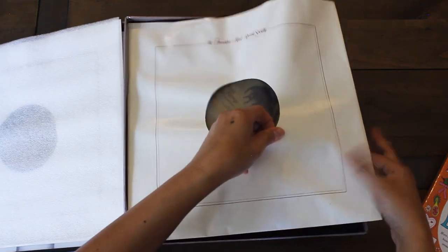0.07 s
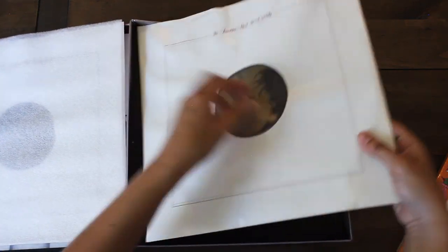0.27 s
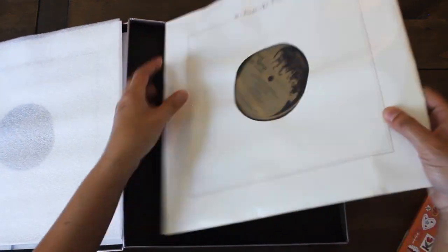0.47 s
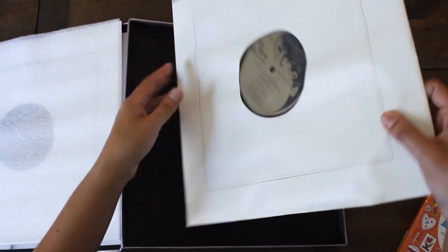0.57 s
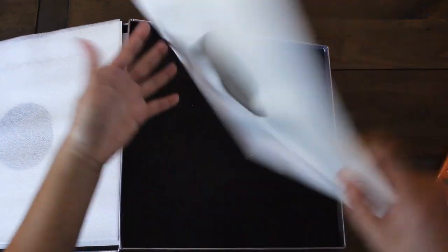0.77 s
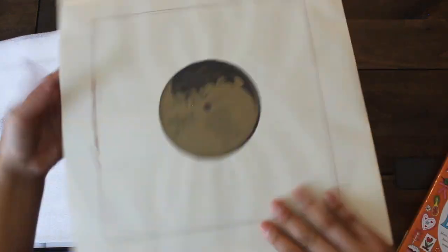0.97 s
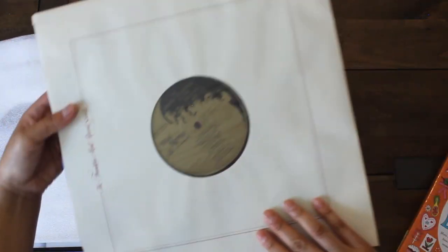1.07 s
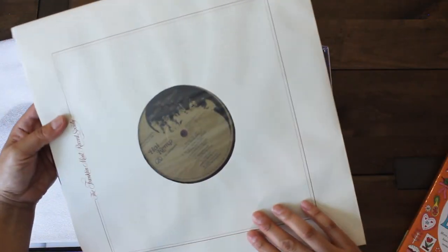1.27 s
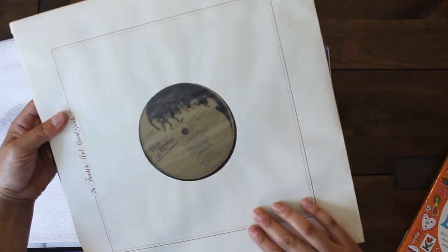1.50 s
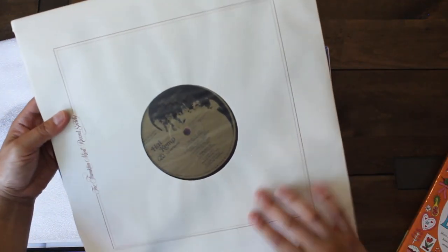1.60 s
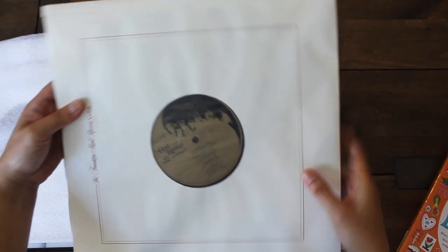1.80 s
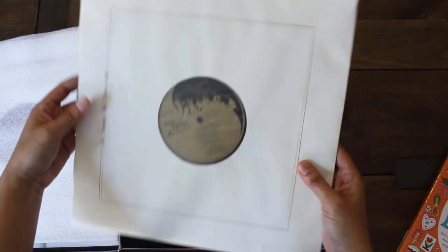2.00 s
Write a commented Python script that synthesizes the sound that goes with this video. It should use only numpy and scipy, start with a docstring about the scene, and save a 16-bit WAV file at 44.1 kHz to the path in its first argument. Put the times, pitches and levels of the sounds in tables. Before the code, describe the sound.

A paper record sleeve slides and pops as it buckles. At 0.3 seconds the vinyl disc inside knocks on a cardboard box and judders along it, knocking again just after 0.5 and bumping free by 0.8. From 0.9 seconds fingers softly tick and brush the paper. After a lull, a light hollow tap comes near 2 seconds. Faint noise and a low hum fill the slightly echoing room.

```python
"""A vinyl record in a paper sleeve is lifted out of a cardboard box in a fairly live room.
First the sleeve slides, and the paper pops as it buckles. At 0.3 s the disc's edge knocks on the box
and starts to judder along it. It knocks again just after 0.5 s, then bumps lightly as it comes free.
From about 0.9 s fingers tick, pat and brush on the paper as it is turned. Near 2 s a hand takes hold
with a light tap. Faint room noise and a mains hum go on throughout."""
import sys
import numpy as np
from scipy import signal
from scipy.fft import rfft, irfft
from scipy.io import wavfile

SR = 44100
rng = np.random.default_rng(int(sys.argv[2]) if len(sys.argv) > 2 else 0)


def transcribe(signal):
    """Save signal, clipped to [-1, 1], as a 16-bit WAV file at the path in sys.argv[1]."""
    frames = np.atleast_2d(signal).T
    limited = np.clip(frames, -1, 1)
    pcm = np.round(limited * 32767).astype(np.int16)
    wavfile.write(sys.argv[1], SR, pcm)


N = 90404
T = np.arange(N) / SR

# The tone of the room noise. Each row: frequency in Hz, level in dB.
NOISE_TONE = [(25, -6), (60, -3.5), (170, -3), (330, 2.5), (480, -4), (750, -6), (1500, -11.5), (4500, -16),
              (9000, -21.5), (16000, -24)]
# How strongly the sleeve slides over the box. Each row: time in seconds, level in dB.
SLIDE_LEVELS = [(0, -42), (.065, -38), (.085, -54), (.165, -43), (.195, -30.5), (.245, -43), (.27, -35),
                (.33, -26), (.44, -30.5), (.51, -34.5), (.55, -59), (.72, -44), (.8, -58)]
# The tone of that sliding. Each row: frequency in Hz, level in dB.
SLIDE_TONE = [(80, -19.5), (400, 9.5), (1000, 3.5), (2000, 5), (4500, -3), (7000, -13.5), (11000, -30),
              (16000, -28)]
# How strongly fingers and air brush the paper. Each row: time in seconds, level in dB.
BRUSH_LEVELS = [(0, -48), (.185, -51), (.2, -39.5), (.245, -31.5), (.33, -43), (.46, -51), (.485, -34),
                (.53, -40), (.56, -46), (.79, -52), (.825, -40.5), (.87, -48.5), (.92, -38), (1.09, -46),
                (1.22, -60), (1.64, -69), (1.69, -45.5), (1.79, -67), (1.84, -55.5), (1.93, -56),
                (2.0, -41), (2.1, -42)]
# The tone of that brushing. Each row: frequency in Hz, level in dB.
BRUSH_TONE = [(100, 3), (500, 1), (1500, -4), (3000, -3), (4800, -1.5), (7000, -4), (11000, -10),
              (16000, -8)]
# The paper buckles. Each row: start in seconds, level in dB, fade time in seconds, treble cut-off in Hz.
BUCKLE_POPS = [(0.0580, -36.5, 0.0066, 5940), (0.1734, -12, 0.0029, 3950), (0.2153, -10.5, 0.0045, 1980),
               (0.225, -8.5, 0.0021, 4000), (0.237, -18, 0.0019, 6000), (0.2478, -25, 0.0024, 3000),
               (0.2803, -7.5, 0.0027, 6050), (0.5356, -3, 0.0014, 3000), (0.8872, -31.5, .004, 5000),
               (0.9255, -26, 0.0022, 6000), (1.7470, -38.5, .004, 4000), (1.8276, -38, 0.0022, 6000),
               (1.8595, -40.5, .003, 9000), (1.8830, -42, .003, 5000), (1.9090, -42, 0.0018, 3020),
               (1.9676, -35.5, 0.0067, 9000), (1.9740, -19, 0.0041, 10300)]
# The tone of those pops. Each row: frequency in Hz, level in dB.
BUCKLE_TONE = [(60, -37.5), (300, -4), (700, -4.5), (1600, -0.5), (2600, -5.5), (4800, -6.5), (6500, -19.5),
               (10000, -25), (16000, -52)]
# Fingers and creases tick. Each row: start in seconds, level in dB, pitch in Hz, fade time in seconds.
PAPER_TICKS = [(0.1250, -32, 12400, 0.0016), (0.1690, -28, 4160, .002), (0.1940, -30, 9000, 0.0055),
               (0.236, -26, 8900, 0.0045), (0.2808, -15, 4800, 0.0011), (0.2977, -15, 7200, 0.0037),
               (0.379, -22, 6860, 0.00089), (0.517, -23, 4540, 0.0036), (0.5226, -22.5, 8400, 0.0028),
               (0.5341, -16, 7400, 0.0017), (0.9104, -21.5, 5600, 0.0017), (1.0584, -33, 4800, .002),
               (1.0860, -28, 4300, 0.0017), (1.156, -25.5, 4100, 0.0028), (1.1660, -28.5, 4440, 0.001),
               (1.666, -29, 4440, .001), (1.6998, -48, 5000, .002), (1.7230, -34, 4700, 0.0018),
               (1.7474, -36, 4260, .002), (1.8204, -30, 11000, 0.0018), (1.8272, -26.5, 4870, 0.0018),
               (1.8592, -39, 7540, .003), (1.8823, -38, 4860, .002), (1.9482, -24, 4300, 0.00099)]
# The disc knocks on the box. Each row: start in seconds, level in dB, treble cut-off in Hz
# (higher for a harder knock), fade time of the scuff in seconds.
DISC_KNOCKS = [(0.2916, -10, 5000, 0.0015), (0.2931, -3, 890, 0.0081), (0.2978, -7, 3600, 0.0068),
               (0.3761, -20.5, 7000, 0.0034), (0.531, -29, 900, 0.0033), (0.5355, -6.5, 4900, 0.00097),
               (0.5390, -18, 805, 0.003), (0.5972, -20, 920, 0.015), (0.6116, -21.5, 600, 0.0095),
               (0.672, -34, 600, .005), (0.7041, -27.5, 1800, 0.0022)]
# The tone of scuffed cardboard. Each row: frequency in Hz, level in dB.
SCUFF_TONE = [(40, -60), (120, -9.5), (300, -7.5), (550, 8.5), (1000, 2.5), (1900, 1), (3500, -9),
              (8000, -12), (16000, -22.5)]
# The notes that box and disc ring with. Each row: pitch in Hz, level in dB, seconds to fade by 60 dB.
KNOCK_NOTES = [(126.4, -19, 0.11), (203.6, -15, 0.086), (295.4, -12.5, 0.11), (443, -8, 0.082),
               (502.4, -1.5, 0.08), (583, -17, 0.095), (792, -13.5, .05), (985, -4.5, 0.044),
               (1234, -6, 0.027), (1655, -16, 0.023), (2030, -38, .02), (2470, -22, 0.025),
               (2645, -2.5, 0.017)]
# How strongly the disc's edge judders along the box. Each row: time in seconds, level in dB.
JUDDER_LEVELS = [(.30, -51.5), (.32, -28), (.36, -31), (.45, -35), (.58, -38.5), (.605, -20.5), (.65, -31),
                 (.73, -28), (.765, -55), (.86, -46.5), (.95, -67)]
# The notes that the dragged edge stirs up. Each row: pitch in Hz, level in dB, filter width in Hz.
JUDDER_NOTES = [(247, -8.5, 68), (304, -11, 30), (456.3, 0.5, 45), (504.7, -2.5, 32), (781, -9, 78)]
# Fingers tap the sleeved disc. Each row: start in seconds, level in dB.
FINGER_TAPS = [(1.0004, -35.5), (1.059, -35.5), (1.088, -34), (1.165, -39), (1.2016, -40), (1.9690, -30.5),
               (1.978, -17.5)]
# The sleeved disc's dull ring. Each row: pitch in Hz, level in dB, seconds to fade by 60 dB.
TAP_NOTES = [(374, -9.5, 0.072), (459, -2.5, .025), (580, 1, .02), (750, -6, 0.031), (1250, -14, 0.018),
             (1610, -8.5, 0.011)]
# The room's echo. Each row: frequency in Hz, seconds to fade by 60 dB, level in dB.
ECHO_BANDS = [(97, 1, -2.5), (238, 1, -4), (515, 0.72, -9.5), (1010, 1, -2.5), (1930, 0.87, -5),
              (4170, 0.68, -9), (8900, 0.56, -9), (16200, 0.23, -15)]


def from_db(db):
    """Turn decibels into a number to multiply a sound by."""
    return 10 ** (np.asarray(db) / 20)


def rms_one(x):
    """Scale a sound so that its average strength (rms) is 1."""
    return x / np.sqrt(np.mean(x ** 2) + 1e-20)


def level(curve):
    """Join (seconds, dB) points into a volume curve that is silent after the last one."""
    return from_db(np.interp(T, *np.transpose(curve), right=-np.inf))


def coloured(x, tone, size=8192):
    """Give a sound the balance of bass and treble in a tone table; white noise keeps its power."""
    hz, db = np.transpose(tone)
    bin_hz = np.fft.rfftfreq(size, 1 / SR)
    gain = rms_one(from_db(np.interp(np.log(bin_hz + 1), np.log(hz), db)))
    # These steps build the filter so that it never sounds before its input does.
    cepstrum = irfft(np.log(gain))
    cepstrum[1:size // 2] *= 2
    cepstrum[size // 2 + 1:] = 0
    return signal.fftconvolve(x, irfft(np.exp(rfft(cepstrum))))[:N]


def softened(x, cut_hz):
    """Turn down the treble, as a softer contact does."""
    return signal.lfilter(*signal.butter(1, cut_hz, fs=SR), x)


def resonance(x, hz, width_hz):
    """Make a sound ring around one pitch; a smaller width rings longer."""
    r = np.exp(-np.pi * width_hz / SR)
    feedback = [1, -2 * r * np.cos(2 * np.pi * hz / SR), r * r]
    return signal.lfilter(np.sqrt((1 - r * r) / 2) * np.array([1, 0, -1]), feedback, x)


def burst(start, fade_s):
    """A flurry of tiny slips that falls to about a third of its strength in fade_s."""
    age = T - start
    return rng.choice([-1., 1.], N) * (age >= 0) * np.exp(-np.abs(age) / fade_s) + 1e-18


def struck(start, notes, scatter_db=1.5):
    """A struck object rings with several fading notes, each at a slightly random strength."""
    hz, db, ring_s = np.transpose(notes)[:, :, None]
    age = T[:SR // 2]
    strength = from_db(scatter_db * rng.standard_normal(hz.shape)) * rng.choice([-1, 1], hz.shape)
    ring = (strength * from_db(db - 60 * age / ring_s) * np.sin(2 * np.pi * hz * age)).sum(0)
    return np.pad(ring, (int(start * SR), N))[:N]


def friction(grains_per_s=3500, grain_share=0.55, spread_db=3, surge_db=2, surges_per_s=70):
    """Paper fibres catch and let go: tiny uneven clicks (grains) on a smooth hiss, in short surges."""
    sizes = from_db(spread_db * np.minimum(rng.exponential(1, N), 4)) * rng.choice([-1, 1], N)
    grains = rms_one(sizes * (rng.random(N) < grains_per_s / SR))
    surges = from_db(surge_db * np.interp(T * surges_per_s, np.arange(N), rng.standard_normal(N)))
    hiss = rng.standard_normal(N)
    return rms_one(surges * (np.sqrt(grain_share) * grains + np.sqrt(1 - grain_share) * hiss))


def background(noise_db=-48.5, hum_db=-53, hum_hz=100.5):
    """Steady room noise and the low hum of mains power."""
    noise = coloured(rng.standard_normal(N), NOISE_TONE)
    hum = np.sqrt(2) * np.sin(2 * np.pi * hum_hz * T)
    return from_db(noise_db) * noise + from_db(hum_db) * hum


def rustle():
    """Paper slides on cardboard and brushes under the fingers."""
    slide = coloured(friction() * level(SLIDE_LEVELS), SLIDE_TONE)
    brush = coloured(friction() * level(BRUSH_LEVELS), BRUSH_TONE)
    return slide + brush


def buckles():
    """The paper pops from one bend into another."""
    pops = sum(from_db(db) * softened(burst(start, fade_s), cut_hz)
               for start, db, fade_s, cut_hz in BUCKLE_POPS)
    return coloured(pops, BUCKLE_TONE)


def ticks():
    """Fingers and creases make small bright snaps, each with a hint of pitch and a duller body."""
    out = np.zeros(N)
    for start, db, hz, fade_s in PAPER_TICKS:
        snap = from_db(db) * burst(start, fade_s)
        ring = resonance(snap, hz, width_hz=.42 * hz) / 2
        body = from_db(-6) * softened(snap, cut_hz=4040)
        out += ring + body
    return out


def knocks(scuff_db=4.5, ring_db=-0.5):
    """Each knock of the disc scuffs the cardboard and sets box and disc ringing."""
    out = np.zeros(N)
    for start, db, cut_hz, fade_s in DISC_KNOCKS:
        scuff = from_db(scuff_db) * coloured(burst(start, fade_s), SCUFF_TONE)
        ring = from_db(ring_db) * struck(start, KNOCK_NOTES)
        out += from_db(db) * softened(scuff + ring, cut_hz)
    return out


def judder():
    """The disc's edge drags along the box and keeps it ringing."""
    drag = friction()
    drone = sum(from_db(db) * rms_one(resonance(resonance(drag, hz, width), hz, width))
                for hz, db, width in JUDDER_NOTES)
    return level(JUDDER_LEVELS) * rms_one(drone)


def taps():
    """Fingertips land on the sleeved disc with a hollow pat."""
    return sum(from_db(db) * struck(start, TAP_NOTES) for start, db in FINGER_TAPS)


def room_echo(x, early_db=-7.5, tail_db=-1, build_s=0.0027):
    """Sound bounces off the nearby table and box walls, then fades in the room, treble first."""
    hz, ring_s, db = np.transpose(ECHO_BANDS)
    noise_spectrum, bin_hz = rfft(rng.standard_normal(N)), np.fft.rfftfreq(N, 1 / SR)
    edges_hz = np.geomspace(40, 20000, 28)
    echo = from_db(early_db) * softened(rms_one(burst(0, fade_s=0.02)), cut_hz=5700)
    for low, high in zip(edges_hz, edges_hz[1:]):
        log_centre = np.log(low * high) / 2
        fade = from_db(-60 * T / np.interp(log_centre, np.log(hz), ring_s)) * (1 - np.exp(-T / build_s))
        band = irfft(noise_spectrum * (bin_hz >= low) * (bin_hz < high), N)
        echo += from_db(tail_db + np.interp(log_centre, np.log(hz), db)) * band * rms_one(fade)
    return signal.fftconvolve(x, echo / np.sqrt(N))[:N]


def scene(bass_cut_hz=107):
    """Mix the handling, too light to give off deep bass, with its echo and the background, in mono."""
    handling = rustle() + buckles() + ticks() + knocks() + judder() + taps()
    handling = signal.sosfilt(signal.butter(2, bass_cut_hz, "high", fs=SR, output="sos"), handling)
    return (handling + room_echo(handling) + background())[None]


def record(dry, rumble_cut_hz=35, treble_cut_hz=15900):
    """The hardest knocks overload the input, which rounds their peaks; rumble and top treble are cut."""
    rounded = dry / (1 + dry ** 10) ** (1 / 10)
    rumble_filter = signal.butter(1, rumble_cut_hz, "high", fs=SR, output="sos")
    treble_filter = signal.ellip(12, .2, 70, treble_cut_hz, fs=SR, output="sos")
    return signal.sosfilt(treble_filter, signal.sosfilt(rumble_filter, rounded))


dry = scene()
out = record(dry)
transcribe(out)
```